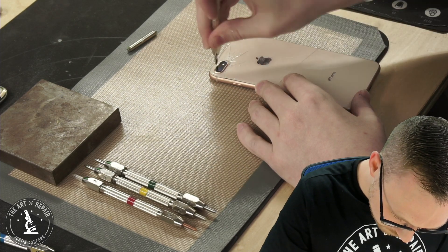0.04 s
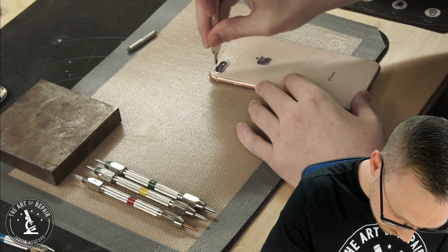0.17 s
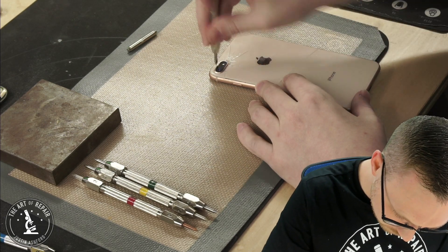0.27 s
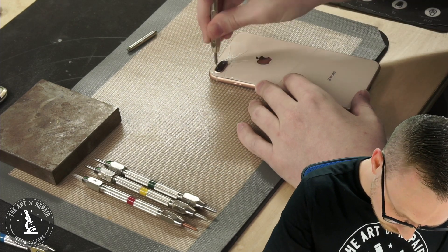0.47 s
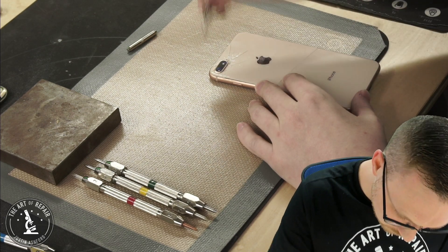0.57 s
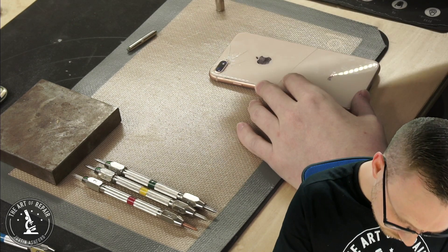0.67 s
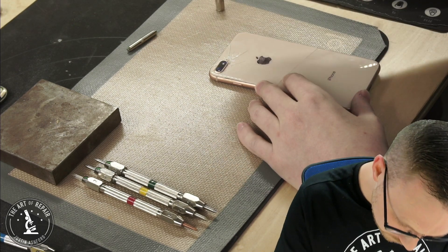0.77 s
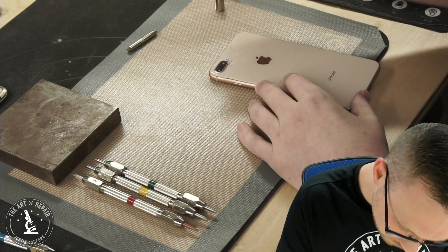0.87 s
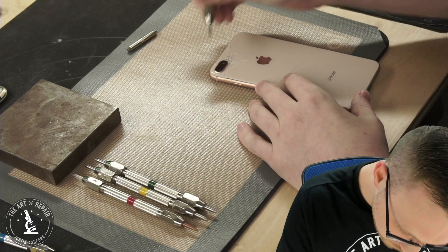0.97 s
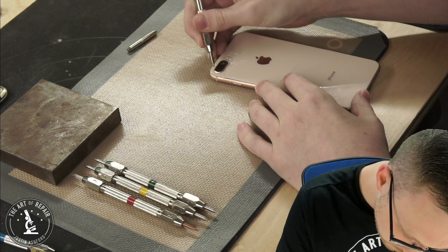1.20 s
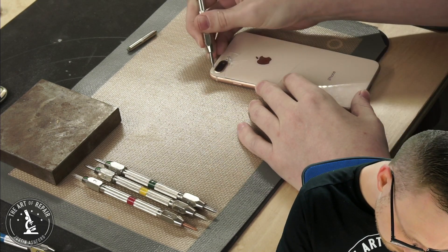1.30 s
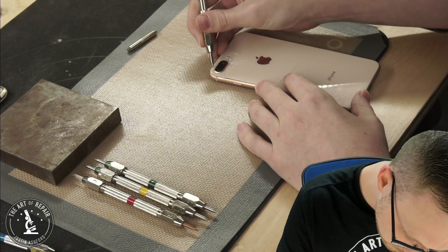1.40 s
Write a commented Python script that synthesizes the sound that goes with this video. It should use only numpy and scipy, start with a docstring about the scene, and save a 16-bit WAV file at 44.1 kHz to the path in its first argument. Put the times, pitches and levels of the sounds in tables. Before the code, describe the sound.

A glass phone back cracks under a pointed steel tool. Faint clicks at 0.01 seconds and a tiny tick near 0.18 precede a loud double-edged snap at 0.23, fused with a hollow bench knock and brief dying chatter. Fine brittle ticks and slight grating scatter from 0.37 to 0.97; a soft tap lands at 1.19. Close pickup, short room reverberation, quiet low hum, fan air and rumble, slightly dulled extreme treble.

```python
"""A workbench in a small room with a fan and mains hum; the bench's direct sound stands above the room tail.
A steel point clicks on the glass back of a phone lying on a mat: short noise ticks and weak body modes.
The glass snaps in two noise bursts, the tool knocks the phone on the bench (decaying modes), and it chatters.
Small cracks tick, one of them before the snap, broken edges grate, and the point is set down again.
The microphone hears it all through reflections, a lingering resonance and a steep treble cut."""
import sys
import numpy as np
from scipy import signal
from scipy.fft import rfft, irfft, next_fast_len
from scipy.io import wavfile

SR = 44100
rng = np.random.default_rng(int(sys.argv[2]) if len(sys.argv) > 2 else 0)


def store_wav(level_fs):
    """Save 16-bit WAV to argv[1]."""
    pcm = np.round(np.clip(np.atleast_2d(level_fs), -1, 1) * 32767)
    wavfile.write(sys.argv[1], SR, pcm.T.astype(np.int16))


N = 63945  # samples, 1.45 s


def from_db(db):
    """Decibels to amplitude gain."""
    return 10 ** (np.asarray(db) / 20)


def rms_one(x):
    """Scale to unit rms."""
    return x / np.sqrt(np.mean(x ** 2) + 1e-20)


def at_hz(points, hz):
    """Read a frequency table on a logarithmic axis."""
    f, v = np.transpose(points)
    return np.interp(np.log(np.maximum(hz, 1)), np.log(f), v)


def seconds():
    """Time axis in seconds."""
    return np.arange(N) / SR


def dying(t60):
    """Exponential decay from 1, falling 60 dB in t60 seconds."""
    return np.exp(-np.log(1000) * seconds() / t60)


def at_time(x, s):
    """Delay a sound to its moment."""
    return np.concatenate([np.zeros(int(s * SR)), x])[:N]


def filtered(x, order, edge_hz, kind):
    """Butterworth filter: 'low', 'high' or 'band'."""
    return signal.sosfilt(signal.butter(order, edge_hz, kind, fs=SR, output="sos"), x)


def resonance(x, hz, width_hz):
    """A band-pass peak with gain 1 on top."""
    b, a = signal.iirpeak(hz, hz / width_hz, fs=SR)
    return signal.lfilter(b, a, x + 1e-18)


def coloured(x, points):
    """Causal minimum-phase filter with the given spectrum."""
    size = 2 * next_fast_len(N)
    hz = np.arange(size // 2 + 1) * SR / size
    cepstrum = irfft(np.log(from_db(at_hz(points, hz))))
    # Folding the cepstrum onto positive time makes the phase minimal
    cepstrum[1:size // 2] *= 2
    cepstrum[size // 2 + 1:] = 0
    response = np.exp(rfft(cepstrum))
    return irfft(rfft(x, size) * response)[:N]


def burst(t60):
    """A dense run of tiny contacts or fractures: dying noise with the same energy at every draw."""
    envelope = dying(t60)
    x = rng.standard_normal(N) * envelope
    return x * np.sqrt(np.sum(envelope ** 2) / np.sum(x ** 2))


# Room air spectrum, before the overall level: f/Hz, level/dB
AIR_COLOUR = [(25, 0.5), (60, -7.5), (110, -2.5), (170, -9), (300, -16), (800, -17), (1500, -17.5),
              (1900, -23), (2800, -22.5), (4000, -30), (8000, -41.5), (15000, -52.5)]
AIR_DB = -62  # overall rms


def room_air():
    """Broadband noise of the room's air."""
    return from_db(AIR_DB) * rms_one(coloured(rng.standard_normal(N), AIR_COLOUR))


FAN_HZ, FAN_WIDTH_HZ, FAN_DB = 1200, 160, -71


def fan():
    """The fan's resonance: noise through one peak."""
    return from_db(FAN_DB) * rms_one(resonance(rng.standard_normal(N), FAN_HZ, FAN_WIDTH_HZ))


# Steady hum tones: f/Hz, rms level/dB
HUM_TONES = [(120, -63.5), (361, -79.5), (1281, -76), (3198, -85.5)]


def hum():
    """Steady sine tones, each starting at a random phase."""
    out = np.zeros(N)
    for hz, db in HUM_TONES:
        tone = np.sin(2 * np.pi * (hz * seconds() + rng.random()))
        out += from_db(db) * rms_one(tone)
    return out


# Low rumble of the bench under the hands: t/s, level/dB
RUMBLE_LEVEL = [(0, -54), (0.2, -55), (0.35, -59), (0.579, -55), (0.8, -66.5), (1.0, -72), (1.45, -69)]
RUMBLE_TOP_HZ = 53.7


def bench_rumble():
    """Low band of noise whose level drifts along the table."""
    rumble = rms_one(filtered(rng.standard_normal(N), 2, [RUMBLE_TOP_HZ / 3, RUMBLE_TOP_HZ], "band"))
    level_db = np.interp(seconds(), *np.transpose(RUMBLE_LEVEL))
    return rumble * from_db(level_db)


def background():
    """Everything that sounds without the tool: air, fan, hum and bench."""
    return room_air() + fan() + hum() + bench_rumble()


# Room tail energy relative to the direct sound: f/Hz, level/dB
ROOM_COLOUR = [(100, -2), (280, -5), (680, -8), (1200, -4), (2000, -3), (4000, -9.5), (8000, -8),
               (15000, -8)]
# Room decay: f/Hz, t60/s
ROOM_T60 = [(100, 0.97), (280, 0.3), (700, 0.32), (1200, 0.34), (2000, .23), (5000, 0.16), (14000, .16)]
ROOM_DELAY_S, ROOM_BUILD_S = 0.002, 0.0013


def room(x):
    """Diffuse reflections that build up quickly and die band by band."""
    edges = np.geomspace(70, 17000, 17)  # Hz
    build = 1 - np.exp(-seconds() / ROOM_BUILD_S)
    white, tail = rng.standard_normal((2, N)), np.zeros(N)
    for k, (low, high) in enumerate(zip(edges, edges[1:])):
        hz = np.sqrt(low * high)
        # Neighbouring bands use different noise; reversal puts the filter's ringing before each sample
        band = filtered(white[k % 2], 2, [low, high], "band")[::-1]
        band = rms_one(band * build * dying(at_hz(ROOM_T60, hz)))
        share = np.sqrt(2 * (high - low) / SR / N)  # the band's share of a unit click
        tail += from_db(at_hz(ROOM_COLOUR, hz)) * band * share
    return signal.fftconvolve(x, at_time(tail, ROOM_DELAY_S))[:N]


LINGER_HZ, LINGER_WIDTH_HZ, LINGER_T60_S, LINGER_DB = 1190, 260, 0.9, -32


def lingering(x):
    """A narrow cluster of slow room resonances: dying noise, peaked twice, as an impulse response."""
    ring = rng.standard_normal(N)
    for _ in range(2):
        ring = resonance(ring, LINGER_HZ, LINGER_WIDTH_HZ)
    ring = rms_one(ring * dying(LINGER_T60_S)) / np.sqrt(N)  # unit energy
    return from_db(LINGER_DB) * signal.fftconvolve(x, ring)[:N]


# Glass edges grating: t/s, length/s, level/dB before the colour
GRATES = [(0.42, 0.014, -52), (0.593, 0.024, -67.5)]
# Spectrum of small glass sounds, for grating and ticks: f/Hz, level/dB
SMALL_GLASS_COLOUR = [(500, -11), (1500, -3), (3000, 1), (6000, 0), (9500, 0), (11500, -3.5), (14500, 4),
                      (16000, -8.5)]
GRAINS_PER_S = 3800  # mean rate


def grating():
    """Short swells of fine random grains where broken edges rub."""
    is_grain = rng.random(N) < GRAINS_PER_S / SR
    grains = rms_one(rng.standard_normal(N) * is_grain)
    swell = np.zeros(N)
    for s, length, db in GRATES:
        progress = np.clip((seconds() - s) / length, 0, 1)
        swell += from_db(db) * np.sin(np.pi * progress)
    return coloured(grains * swell, SMALL_GLASS_COLOUR)


# Cracks creeping through the pane, levels before the colour:
# t/s, level/dB, t60/s, ring f/Hz, ring level/dB re the tick, top edge f/Hz
TICKS = [(0.176, -54.5, 0.0072, 5500, -12, 16100), (0.3730, -36.5, 0.013, 8500, -20.5, 15500),
         (0.4228, -46.5, 0.008, 13100, 11.5, 16000), (0.5161, -54.5, .004, 6100, 2, 10800),
         (0.7073, -55.5, .008, 9200, 0, 12800), (0.7510, -51.5, .006, 9100, 9.5, 14300),
         (0.9186, -56.5, 0.027, 9400, 9, 10400), (0.9712, -56, 0.025, 6700, 7, 10000)]
SHARD_WIDTH_HZ = 1000


def ticks():
    """Each small crack is a bright noise tick, coloured by the damped ring of a shard."""
    out = np.zeros(N)
    for s, db, t60, hz, ring_db, top_hz in TICKS:
        tick = burst(t60)
        tick = tick + from_db(ring_db) * resonance(tick, hz, SHARD_WIDTH_HZ)
        out += from_db(db) * at_time(filtered(tick, 3, top_hz, "low"), s)
    return coloured(out, SMALL_GLASS_COLOUR)


def mode(hz, t60):
    """One struck resonance: a decaying sine."""
    return np.sin(2 * np.pi * hz * seconds()) * dying(t60)


# Phone, tool and bench ring together, before random variation and contact: f/Hz, level/dB, t60/s
BODY_MODES = [(152.5, -34.5, .6), (188.1, -37.5, 0.44), (285.2, -28, 0.28), (393.4, -21, .06),
              (448.5, -26.5, .14), (545.5, -24, .03), (693, -8.5, .036), (815, -16, 0.023),
              (1044, -18, 0.044), (1210.3, -18, 0.062), (1390, -20.5, 0.047), (1532, -26.5, 0.03),
              (2604, -13.5, 0.012), (4480, -24, 0.0024), (5700, -13, 0.0026)]
CONTACT_HZ, VARY_DB = 4350, 1.5  # contact low-pass; spread of mode levels from blow to blow


def body():
    """One blow on phone and bench: a sum of modes, softened by the contact."""
    rings = np.zeros(N)
    for hz, db, t60 in BODY_MODES:
        rings += from_db(db + VARY_DB * rng.standard_normal()) * mode(hz, t60)
    return -filtered(rings, 1, CONTACT_HZ, "low")


# Point touching the glass, before the filters: t/s, body level/dB, contact tick level/dB
TOUCHES = [(0.0114, -35, -34.5), (0.0203, -43.5, -39.5), (1.1898, -33.5, -45)]
# Spectrum of the contact tick: f/Hz, level/dB
TOUCH_COLOUR = [(300, 0), (700, 3), (1200, 7), (1800, -1), (2800, -0.5), (4000, -0.5), (6000, -2),
                (9000, -1.5), (11500, -9), (14500, -6)]
TOUCH_T60_S, TOUCH_LOW_CUT_HZ = 0.014, 420


def touches():
    """Light contacts of the point: a tick and a little of the body, too weak to move the bench."""
    knocks, tips = np.zeros(N), np.zeros(N)
    for s, body_db, tick_db in TOUCHES:
        knocks += from_db(body_db) * at_time(body(), s)
        tips += from_db(tick_db) * at_time(burst(TOUCH_T60_S), s)
    return filtered(knocks, 2, TOUCH_LOW_CUT_HZ, "high") + coloured(tips, TOUCH_COLOUR)


# The pane snaps, before the colour: t/s, level/dB
SNAPS = [(0.2323, -9.5), (0.2353, -16)]
# Spectrum of the snaps: f/Hz, level/dB
SNAP_COLOUR = [(150, 0), (600, 16), (1500, 1.5), (2700, -0.5), (3600, 0), (5500, -2.5), (7500, -12.5),
               (9300, -6.5), (11000, -13), (13200, -9), (16000, -8.5)]
SNAP_T60_S = 0.011


def snaps():
    """The glass breaks in dense bursts of fracture noise."""
    out = sum(from_db(db) * at_time(burst(SNAP_T60_S), s) for s, db in SNAPS)
    return coloured(out, SNAP_COLOUR)


KNOCK_S, KNOCK_DB, KNOCK_LOW_CUT_HZ = 0.2344, -0.5, 170  # level is a gain on the body modes


def knock():
    """The tool drives the phone onto the bench and rings the body modes."""
    blow = from_db(KNOCK_DB) * at_time(body(), KNOCK_S)
    return filtered(blow, 2, KNOCK_LOW_CUT_HZ, "high")


# Spectrum of the phone's chatter on the bench: f/Hz, level/dB
CHATTER_COLOUR = [(100, -13.5), (250, 2), (600, -2), (850, -5.5), (1150, 2.5), (1550, 2.5), (1900, -13),
                  (2700, -9), (3400, -23), (15000, -34.5)]
CHATTER_S, CHATTER_DB, CHATTER_T60_S = 0.2395, -7.5, 0.1  # level before the colour


def chatter():
    """Just after the knock the phone chatters to rest: a dying run of dense contacts."""
    contacts = from_db(CHATTER_DB) * at_time(burst(CHATTER_T60_S), CHATTER_S)
    return coloured(contacts, CHATTER_COLOUR)


def scene():
    """Glass and tool in the room, over the background."""
    direct = grating() + ticks() + touches() + snaps() + knock() + chatter()
    return (background() + room(direct) + lingering(direct) + direct)[None]


CUTOFF_HZ = 15700


def record(dry):
    """The microphone signal loses its top to a steep elliptic low-pass."""
    low_pass = signal.ellip(10, 0.2, 80, CUTOFF_HZ, fs=SR, output="sos")  # ripple dB, rejection dB
    return signal.sosfilt(low_pass, dry)


dry = scene()
out = record(dry)
store_wav(out)
```